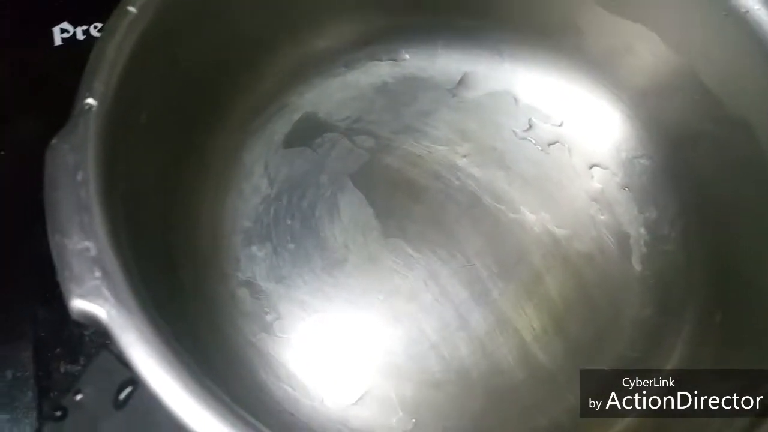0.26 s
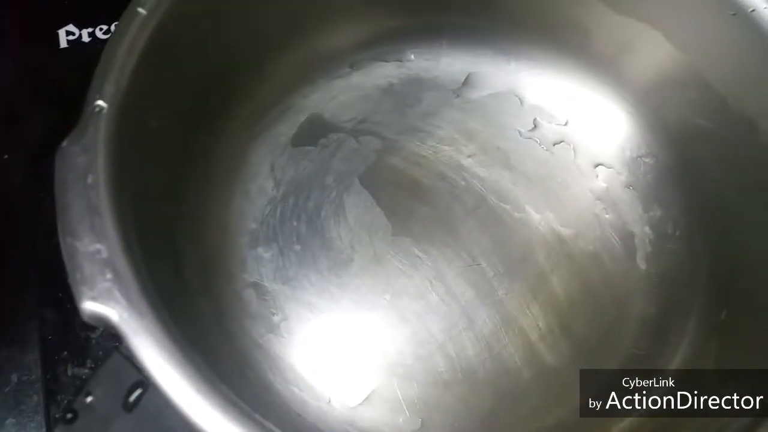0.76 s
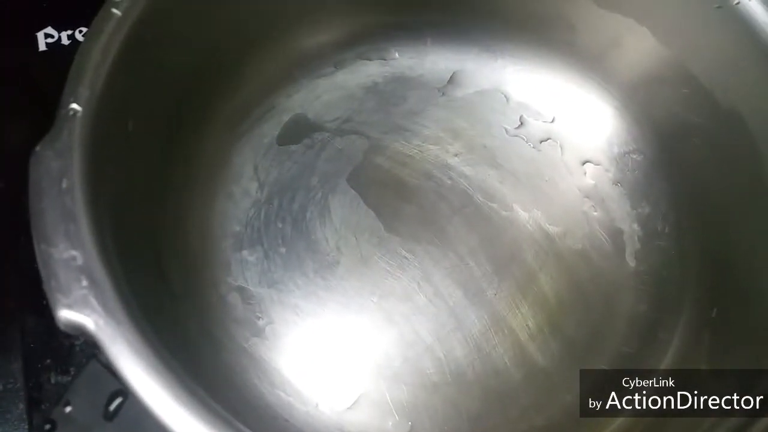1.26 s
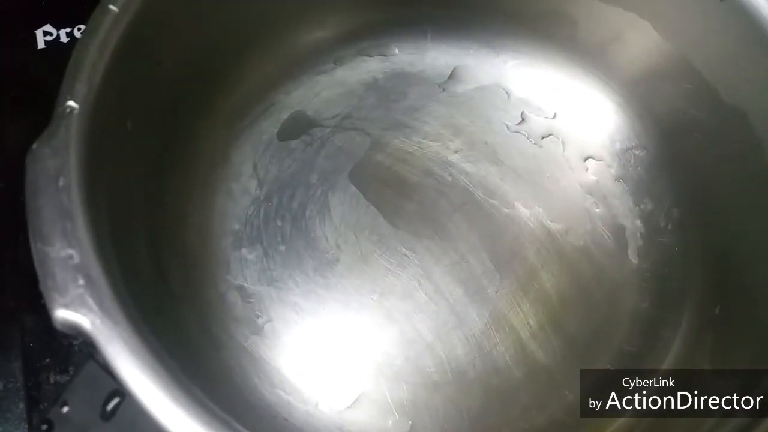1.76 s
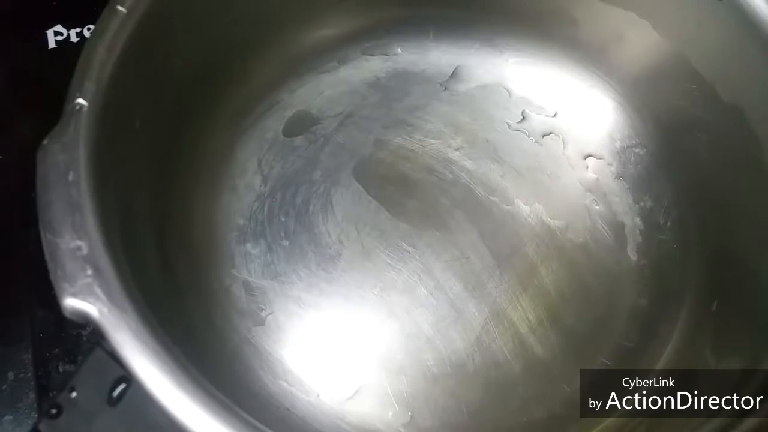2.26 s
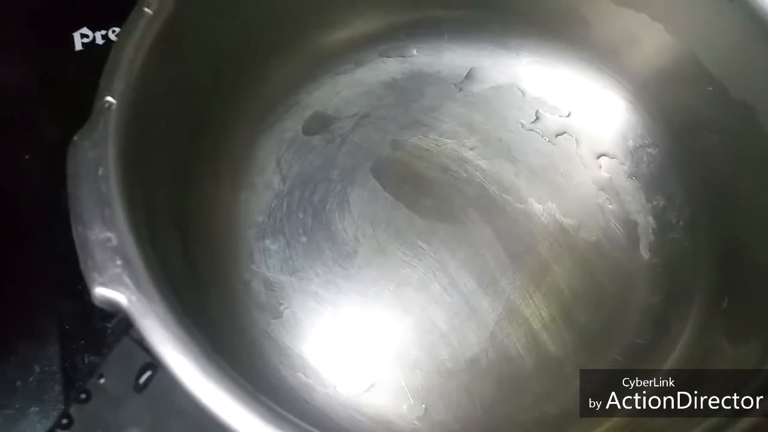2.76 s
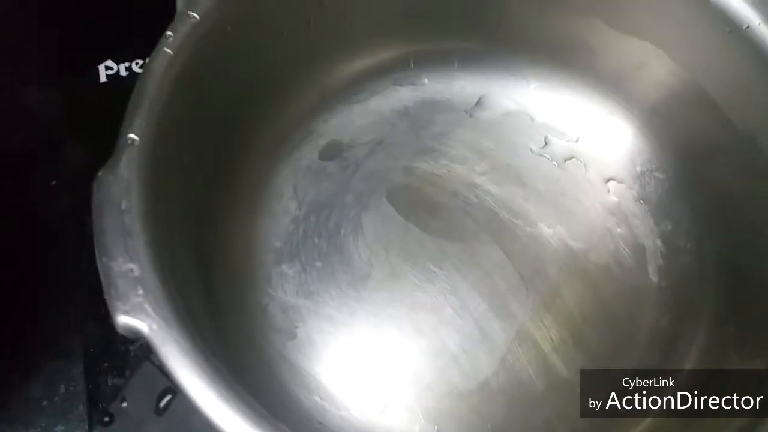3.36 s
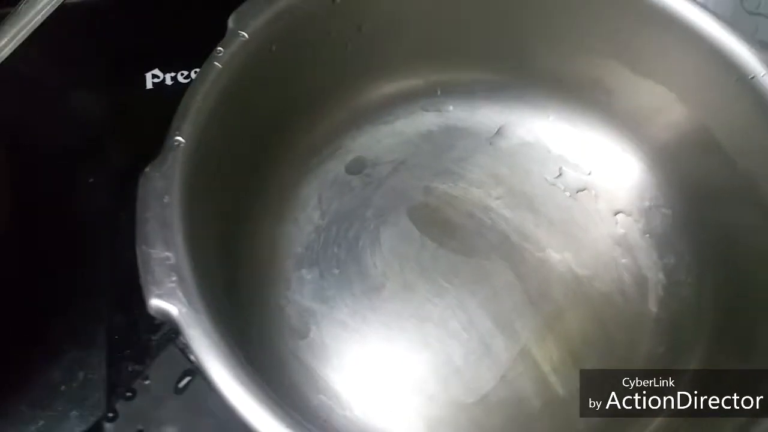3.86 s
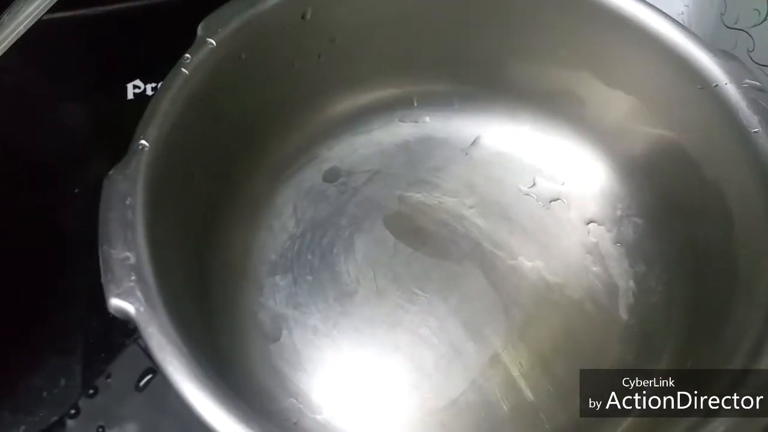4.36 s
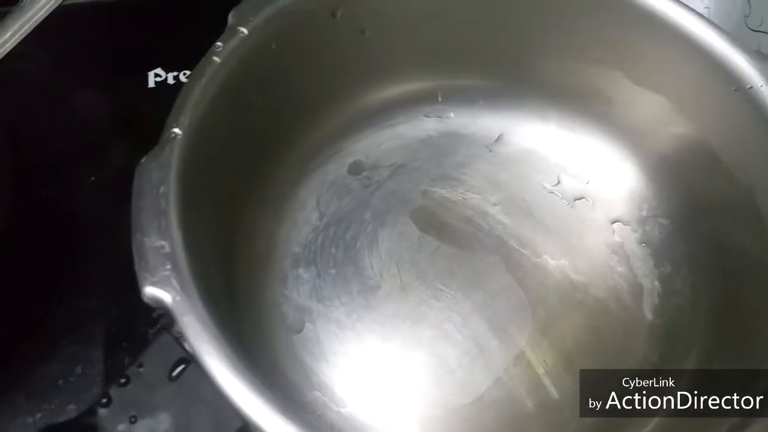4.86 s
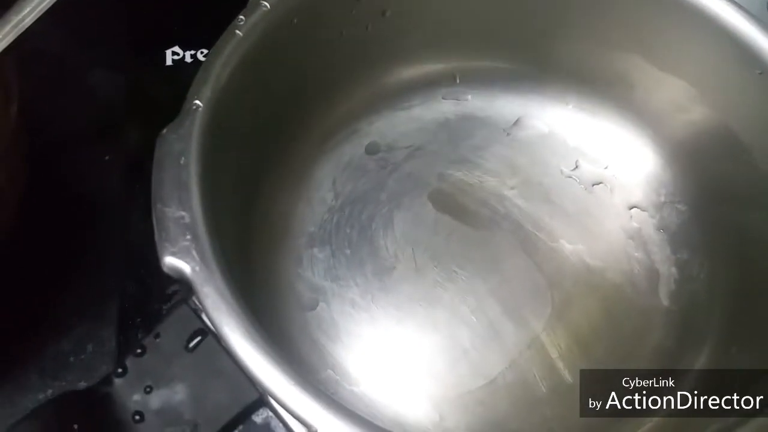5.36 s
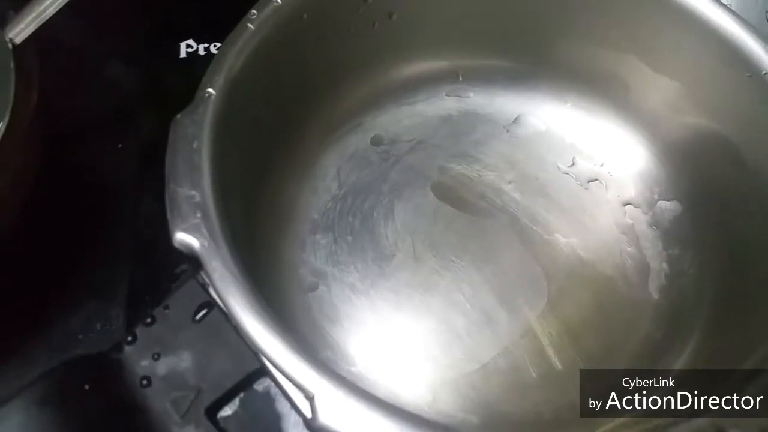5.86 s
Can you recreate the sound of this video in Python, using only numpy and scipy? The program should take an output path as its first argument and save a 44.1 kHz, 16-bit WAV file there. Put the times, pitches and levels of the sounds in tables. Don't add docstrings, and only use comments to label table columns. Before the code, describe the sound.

A steady cooling fan fills the whole six seconds: a soft, mid-low airy rush with a low mains hum that slowly weakens and faint blade whine. Over it, a wet steel pot on the hob sizzles very high and thin, grainy and buzzing in quick mains-rate bursts, slightly to the right; a piercing upper ring is strongest in the first 0.35 seconds. At about 0.2 a light steel tap rings on the left. At 2.05 a utensil knocks, then scrapes faintly until 2.4. The sizzle dips around 3, and tiny microphone-handling ticks appear at 3.2, 3.9, and from 4.8 to 5.3, one with a small plastic-like ring at 4.9. At 5.36 a loud bright clink bursts out, with bounces and a rattling scrape, and a dull worktop thump at 5.5. The ring fades by 6 as the high sizzle flares again.

```python
import sys
import numpy as np
from scipy import signal
from scipy.fft import rfft, irfft
from scipy.io import wavfile
from scipy.ndimage import uniform_filter1d

SR = 44100
rng = np.random.default_rng(int(sys.argv[2]) if len(sys.argv) > 2 else 0)


def how_loud(loudness_db):
    steps = np.asarray(loudness_db, float) / 20
    return 10 ** steps


def generate_wav(sig):
    pcm = np.round(np.clip(np.atleast_2d(sig).T, -1, 1) * 32767).astype(np.int16)
    wavfile.write(sys.argv[1], SR, pcm)


N = 269098

MAINS_HZ = 49.957
# start_s, peak_db, pan_db (left minus right)
BLOWS = [
    (0.175, -17, 10.5),
    (2.0485, -16, -1.5),
    (5.3637, -7.5, -2.0),
]


def rms_one(x):
    return x / np.sqrt(np.mean(x ** 2) + 1e-20)


def in_time(rows):
    s, *columns = np.transpose(rows)
    return [np.interp(np.arange(N) / SR, s, c) for c in columns]


def at_hz(points, hz):
    point_hz, value = np.transpose(points)
    return np.interp(np.log(hz + 1), np.log(point_hz), value)


def drift(rate):
    r = np.exp(-80 * np.pi * rate / SR)
    noise = rng.standard_normal(N // 40 + 2002)
    slow = signal.lfilter([1], [1, -2 * r, r * r], noise)[2000:]
    return np.interp(np.arange(N) / 40, np.arange(len(slow)), rms_one(slow))


def ring(clicks, hz, t60):
    r = how_loud(-60 / (t60 * SR))
    w = 2 * np.pi * hz / SR
    return signal.lfilter([0, np.sin(w)], [1, -2 * r * np.cos(w), r * r], clicks + 1e-18)


def peak(x, hz, width):
    r = np.exp(-np.pi * width / SR)
    section = [1, 0, -1, 1, -2 * r * np.cos(2 * np.pi * hz / SR), r * r]
    return rms_one(signal.sosfilt([section, section], x))


def band(x, low_hz, high_hz):
    return signal.sosfilt(signal.butter(2, [low_hz, high_hz], "band", fs=SR, output="sos"), x)


def tilt(pan_db):
    return how_loud([[pan_db / 2], [-pan_db / 2]])


def panned(x, pan_db, lag=0):
    return np.array([np.roll(x, int(lag)), x]) * tilt(pan_db)


def fan():
    # pitch_hz, level_db (per Hz)
    rush = [(18, -49), (30, -30), (97, -10.5), (171, -9), (202, -10), (270, -12.5), (414, -8), (513, -11.5),
            (552, -9.5), (848, -15), (1210, -19), (1470, -22), (2790, -27.5), (4500, -37), (9000, -38),
            (11700, -65), (19800, -120)]
    # pitch_hz, width_hz, boost_db
    duct = [(444, 87, 3), (555, 8.3, 3), (1263, 91, 6), (2890, 640, 5), (4100, 890, 4), (4840, 200, -6),
            (4910, 470, 9), (6260, 1700, 1), (6700, 790, 11), (6870, 52, -7), (9000, 180, 0)]
    # pitch_hz, level_db (rms), pan_db (left minus right)
    tones = [
        (56.8, -56, 0),
        (199.5, -39.5, 0),
        (241.5, -55, 1),
        (481.5, -48.5, 4),
        (968, -60, -6),
        (1177, -58, 12.5),
        (1219, -60, -3),
    ]
    # pitch_hz, likeness (0 to 1)
    likeness = [(60, 0.69), (150, 0.93), (300, 1), (640, 1), (1400, 0.11), (3000, 0.28), (7000, 0.12)]
    # pitch_hz, pan_db (left minus right)
    lean = [(60, 1), (180, -5.5), (550, 0.5), (1650, -7), (4970, -3.5), (15000, -4)]
    left_lag_s, in_step_s = .00014, 4.24
    t = np.arange(N) / SR

    hz = np.fft.rfftfreq(N, 1 / SR)
    boost_db = sum(db / (1 + (2 * (hz - f) / width) ** 2) for f, width, db in duct)
    colour = how_loud(at_hz(rush, hz) + boost_db) * (hz < 14000)
    alike = np.clip(at_hz(likeness, hz), 0, 1)
    mid, side = rfft(rng.standard_normal((2, N)))
    mid = np.sqrt(1 + alike) * mid
    side = np.sqrt(1 - alike) * side
    lean_db = at_hz(lean, hz)
    left = (mid + side) * how_loud(lean_db / 2) * np.exp(-2j * np.pi * hz * left_lag_s)
    right = (mid - side) * how_loud(-lean_db / 2)
    out = how_loud(-35 + 1.05 * drift(2.02)) * rms_one(irfft(colour * [left, right], N))

    hum = how_loud(-43 - 2 * t) * np.cos(4 * np.pi * MAINS_HZ * (t - in_step_s))
    motor = how_loud(-59) * np.cos(2 * np.pi * 98.05 * (t - in_step_s))
    out = out + np.sqrt(2) * (hum + motor)

    for tone_hz, db, pan_db in tones:
        wander = np.cumsum(0.263 * drift(1.58)) / SR * (tone_hz > 220)
        tone = np.sin(2 * np.pi * tone_hz * (t + wander / 242))
        out = out + panned(np.sqrt(2) * how_loud(db + 1.25 * drift(1.9)) * tone, pan_db, lag=5.1)
    return out


def coil_force(memory, width, between):
    # place (share of the cycle), level_db
    pulls = [
        (0, 0),
        (.18, -4),
        (.5, -3),
        (.7, -5),
    ]
    cycles = (np.arange(N) / SR - .0155) * MAINS_HZ + 1
    which, place = cycles.astype(int), cycles % 1
    count, size = which[-1] + 1, int(SR / MAINS_HZ) + 1
    keep = np.clip(memory, 0, .98)
    noise = rng.standard_normal((count + 20, size))
    pattern = signal.lfilter([np.sqrt(1 - keep ** 2)], [1, -keep], noise, axis=0)[20:]
    within = np.arange(N) - np.searchsorted(which, which)
    gate = between
    for at, db in pulls:
        away = (place - at + .5) % 1 - .5
        gate = gate + how_loud(db) * np.exp(-(away / width) ** 2)
    cycle_gain = how_loud(1.2 * rng.standard_normal(count))
    return gate * pattern[which, np.minimum(within, size - 1)] * cycle_gain[which]


def high_ring_db():
    # start_s, end_s, level_db
    flares = [
        (-.1, .35, -44.5),
        (4.232, 5.02, -53.5),
        (5.55, 6.2, -47.5),
    ]
    t = np.arange(N) / SR
    total = how_loud(-58.5)
    for start, end, db in flares:
        swell, fade = (t - start) / 0.04, (end - t) / 0.11
        total = total + how_loud(db) * np.exp(np.minimum(0, np.minimum(swell, fade)))
    return 20 * np.log10(total)


def pot_base():
    # time_s, level_db
    sizzle = [(0.0, -44.5), (0.64, -45), (1.75, -49), (2.23, -47.5), (2.94, -50), (3.26, -50),
              (3.84, -46.5), (4.3, -49.5), (4.86, -45), (5.33, -49), (5.52, -42.5), (6.1, -45.5)]
    # pitch_hz, width_hz, level_db
    base = [
        [(7580, 190, -9), (7890, 150, -13), (8420, 160, -10.5), (9620, 240, -4), (9870, 120, 0),
         (13200, 440, -12), (13900, 380, -7), (14300, 190, -13)],
        [(10630, 240, -0.5), (10700, 600, 2), (11000, 410, 0), (11100, 350, -24)],
        [(11780, 220, 15), (11300, 180, -18)],
    ]
    sizzle_db, = in_time(sizzle)
    low_db = -53 + 0.18 * (sizzle_db - sizzle_db.mean())
    middle_db = sizzle_db - 0.5
    forces = np.array([coil_force(memory=.7, width=.05, between=.25),
                       coil_force(memory=.6, width=.06, between=.55)])
    out = np.zeros((2, N))
    for modes, level_db in zip(base, [low_db, middle_db, high_ring_db()]):
        group = 0
        for hz, width, db in modes:
            shared, own = np.roll(peak(forces, hz, width), rng.integers(-70, 70), axis=1)
            pair = panned(shared, 0, lag=rng.integers(1, 9)) + 0.43 * own * [[1], [-1]]
            group = group + how_loud(db + 1.2 * drift(0.15)) * pair
        out += how_loud(level_db + 3) * rms_one(group)
    skirt = band([forces[1], np.roll(forces[1], 883)], 8900, 12700)
    return (out + how_loud(middle_db - 4) * rms_one(skirt)) * tilt(-8.5)


def utensil():
    # pitch_hz, t60_s, tap_db, knock_db, clink_db, first_drag_db, second_drag_db
    bowl = [(2280, 0.95, -5.5, -13, -11, -28, -29), (2340, 0.23, -22, -9, -23, -20, -9.5),
            (2654, 0.34, -11.5, -1.5, -20, -26, -10), (3116, 0.73, -21, -16, -31, -1.5, -7.5),
            (3512, 0.25, -15, -14, -24, -8.5, -5), (3720, 0.4, -9, -10, -1, -18, -5.5),
            (4740, 0.42, -19, -21, -12.5, -16, -10), (6100, 0.31, -19, -26, -25, -25, -7),
            (6730, 0.34, -28, -21, -13, -4.5, -18), (7540, 0.14, -5.5, -18, 2.5, -7, -5.5),
            (8280, 0.096, -10, -17, 2, -19, -4), (8620, 0.32, -14, -19, -5, -8, -23),
            (8350, 0.26, -12, -17, -17, -5, -0.5), (11300, 0.29, -13, -21, -25, -6, -12)]
    # pitch_hz, struck_db, dragged_db
    handle = [(2500, -20.5, -9), (2810, -20.5, -37), (3884, -18.5, -15), (4496, -19, -17),
              (5090, -16.5, -12), (6020, -13.5, -20), (7910, -18, -9.5), (10130, -36, -21.5),
              (11580, -22, -16), (12200, -22, -5), (12650, -14, -14.5)]
    # start_s, peak_db
    bounces = [
        (5.3714, -13),
        (5.3992, -24),
        (5.5074, -10),
        (5.5287, -23),
        (5.541, -17),
        (5.5658, -29),
    ]
    # start_s, peak_db
    slips = [
        (2.1, -39),
        (2.1349, -25),
        (2.21, -37),
        (2.2257, -26),
        (2.2694, -56),
        (2.2839, -23),
    ]
    # time_s, level_db
    drags = [
        [(2.06, -48), (2.094, -51), (2.098, -48), (2.214, -44), (2.246, -45.5), (2.28, -43.5), (2.412, -59),
         (2.42, -45)],
        [(5.37, -29), (5.396, -35.5), (5.498, -37.5), (5.544, -26), (5.556, -46), (5.564, -29), (5.648, -49),
         (5.72, -58)],
    ]
    t = np.arange(N) / SR
    live = np.flatnonzero(sum((t > row[0] - .05) & (t < row[0] + .8) for row in BLOWS))
    first, second = ((how_loud(in_time(rows)[0]) * (t > rows[0][0]) * (t < rows[-1][0]))[live] for rows in drags)
    white = rng.standard_normal((2, len(live)))
    uneven = how_loud(0.51 * drift(70))[live]
    wander = drift(21)

    touches = BLOWS + slips + bounces
    at = np.searchsorted(live, [round(row[0] * SR) for row in touches])
    peak_db = np.array([row[1] for row in touches])
    held = [(hz, 0.069, *[struck_db] * 3, *[dragged_db] * 2) for hz, struck_db, dragged_db in handle]
    steel = np.zeros((2, len(live)))
    for k, (hz, t60, tap_db, knock_db, clink_db, first_db, second_db) in enumerate(bowl + held):
        flutter = how_loud(3.97 * np.roll(wander, 9001 * k)[live]) * uneven
        rub = first * how_loud(first_db) + second * how_loud(second_db)
        grit = np.roll(white, 977 * k, axis=1) * flutter * rub
        split = 1 + rng.uniform(0.0043, 0.0209) * rng.choice([-1, 1])
        for side, twin in enumerate((1, split)):
            slip_db = first_db - 6 + rng.normal(0, 4, len(slips))
            bounce_db = second_db - 5 + rng.normal(0, 4, len(bounces))
            touch_db = np.r_[tap_db, knock_db, clink_db, slip_db, bounce_db]
            twin_loss_db = side * (8 if hz > 3300 else 24)
            clicks = np.zeros(len(live))
            clicks[at] = how_loud(peak_db - 11.5 - twin_loss_db + touch_db)
            struck = ring(clicks, hz * twin, t60 * (1 - 0.55 * side))
            scraped = how_loud(-19.5) * ring(grit[side], hz * twin, 0.35 * t60) / np.sqrt(t60 / 0.15)
            steel += panned(struck + scraped, rng.normal(-2, 2.5), lag=rng.integers(2, 7))

    steel = signal.sosfilt(signal.butter(3, 1900, "high", fs=SR, output="sos"), steel)
    steel += band(white * uneven * (first * how_loud(6.5) + second * how_loud(6)), 4600, 17000)
    steel += band(white[::-1] * uneven * second, 1900, 5200)
    out = np.zeros((2, N))
    out[:, live] = steel
    return out


def burst(s, length, centre_hz, spread):
    start, t = round(s * SR), np.arange(SR // 5) / SR
    noise = rng.standard_normal((2, len(t)))
    shared, own = rms_one(band(noise, centre_hz / spread, min(centre_hz * spread, 16000)))
    out = np.zeros((2, N))
    out[:, start:start + len(t)] = (shared + 0.92 * own * np.array([[1], [-1]])) * np.exp(-t / length)
    return out


def worktop():
    # start_s, level_db, pitch_hz, t60_s, knock_db
    thud = (5.506, -17, 158, 0.18, -19.5)
    s, db, hz, t60, knock_db = thud
    t = np.clip(np.arange(N) / SR - s, 0, 1)
    thump = how_loud(db) * np.sin(2 * np.pi * hz * t) * (1 - np.exp(-t / 0.026)) * how_loud(-60 * t / t60)
    rumble = burst(s, 0.022, 680, 1.18) + 0.48 * burst(s + 0.032, 0.03, 820, 1.5)
    tap_crack = how_loud(-35.5) * burst(BLOWS[0][0], 0.005, 5000, 2.3)
    clink_crack = how_loud(-26) * burst(BLOWS[2][0], 0.0039, 5240, 1.1)
    return thump + tap_crack + how_loud(knock_db - 7.5) * rumble + clink_crack


def grip():
    # start_s, peak_db, centre_hz, length_s, pan_db (left minus right)
    creaks = [(3.197, -30.5, 7000, 0.0046, -9), (3.871, -36, 9000, 0.0044, 0),
              (3.894, -35, 6000, 0.023, -3), (3.987, -38, 9000, 0.0065, -4), (4.3, -41, 8000, 0.0074, 2),
              (4.773, -34, 4000, .003, 5), (4.892, -32.5, 6500, 0.039, 0), (5.193, -33, 6000, 0.007, 0),
              (5.282, -30, 9500, 0.0048, 6), (5.294, -29, 7000, 0.012, 0.5), (5.854, -37, 2500, 0.0045, -9)]
    # pitch_hz, level_db, t60_s
    shell = [
        (3140, -32, 0.05),
        (3740, -38, 0.05),
        (4860, -37, 0.068),
        (6500, -38, 0.089),
        (7900, -34, 0.07),
    ]
    ticks = np.zeros((2, N))
    for s, db, hz, length, pan_db in creaks:
        ticks += how_loud(db - 7) * tilt(pan_db) * burst(s, length, hz, spread=2.6)
    click = np.zeros(N)
    click[round(4.902 * SR)] = 1
    shell_ring = sum(how_loud(db) * ring(click, hz, t60) for hz, db, t60 in shell)
    return ticks + panned(shell_ring, 5.1, lag=4.4)


def thin_treble(x, margin_db, follows, spared_hz, lowest_hz, top_hz, top_rise_db):
    turn = np.array([[1, 1], [1, -1]]) / np.sqrt(2)
    lead = 496
    settings = dict(nperseg=2048, noverlap=1024, window="cosine")
    frames = signal.stft(turn @ np.pad(x, ((0, 0), (lead, 0))), **settings)[2][:, :1024]
    line_db = 20 * np.log10(np.abs(frames) + 1e-10)
    hz = np.arange(1024)[:, None] * SR / 2048
    band_db = np.repeat(line_db.reshape(2, 64, 16, -1).mean(axis=2), 16, axis=1)
    around_db = uniform_filter1d(line_db.max(axis=0), size=121, axis=0)
    usual_db = np.median(around_db, axis=1, keepdims=True)
    ceiling_db = usual_db[(hz > lowest_hz) & (hz < spared_hz[0])].mean()
    step_db = np.minimum(usual_db, ceiling_db) + follows * (around_db - usual_db) - margin_db
    weak = line_db < step_db + 1.5 * (step_db - 2.5 - band_db)
    weak &= (hz > lowest_hz) & ((hz < spared_hz[0]) | (hz > spared_hz[1]))
    usual_band_db = np.median(band_db, axis=2, keepdims=True)
    weak |= (band_db < usual_band_db + top_rise_db) & (hz > top_hz)
    kept = np.pad(frames * ~weak, ((0, 0), (0, 1), (0, 0)))
    return turn @ signal.istft(kept, **settings)[1][:, lead:lead + N]


def scene():
    return fan() + pot_base() + utensil() + worktop() + grip()


def band_limit(x):
    return signal.sosfilt(signal.butter(12, 15740, fs=SR, output="sos"), x)


def record(dry):
    x = signal.sosfilt(signal.cheby2(10, 60, 16100, fs=SR, output="sos"), dry)
    x = thin_treble(x, margin_db=.4, follows=.76, spared_hz=(9400, 12400), lowest_hz=3400,
                    top_hz=14000, top_rise_db=3)
    return band_limit(x)


dry = scene()
out = record(dry)
generate_wav(out)
```